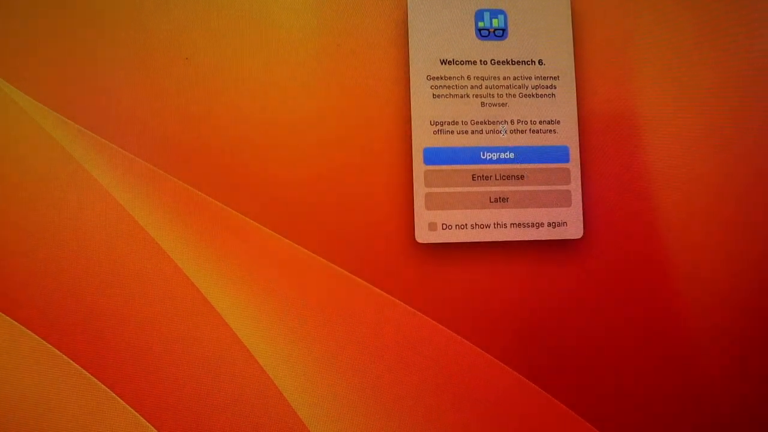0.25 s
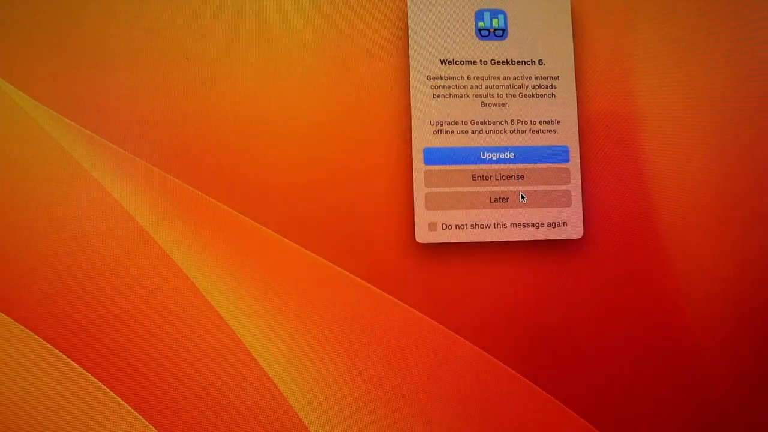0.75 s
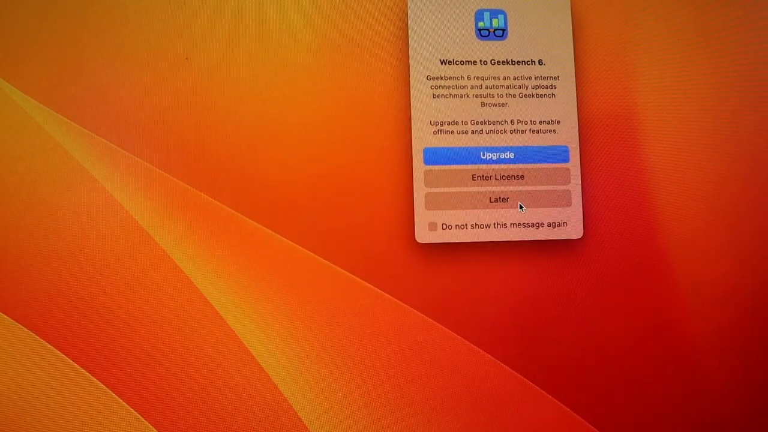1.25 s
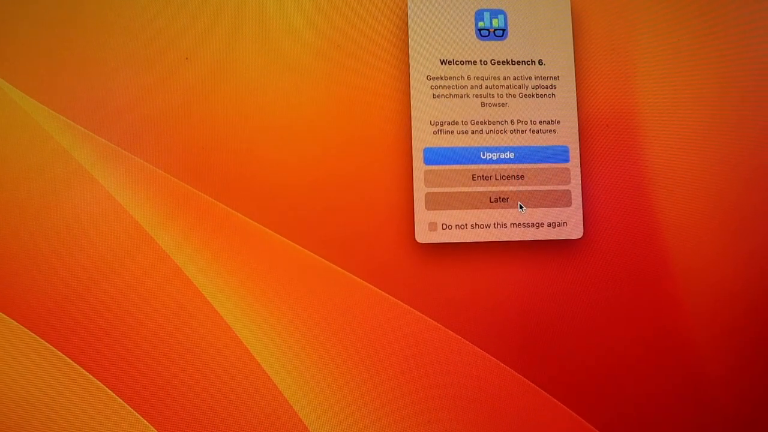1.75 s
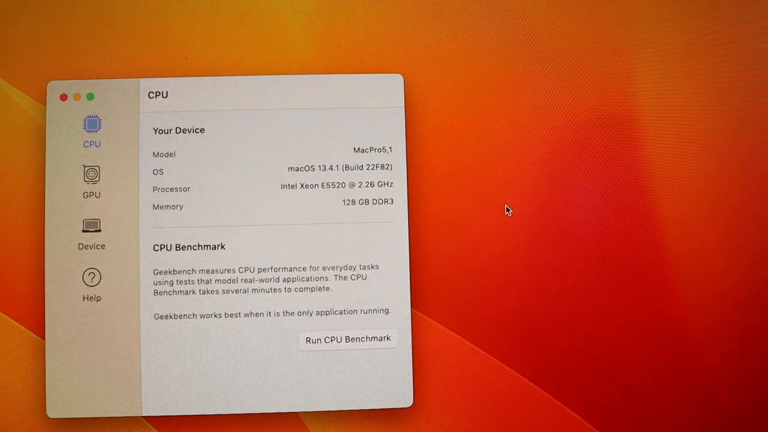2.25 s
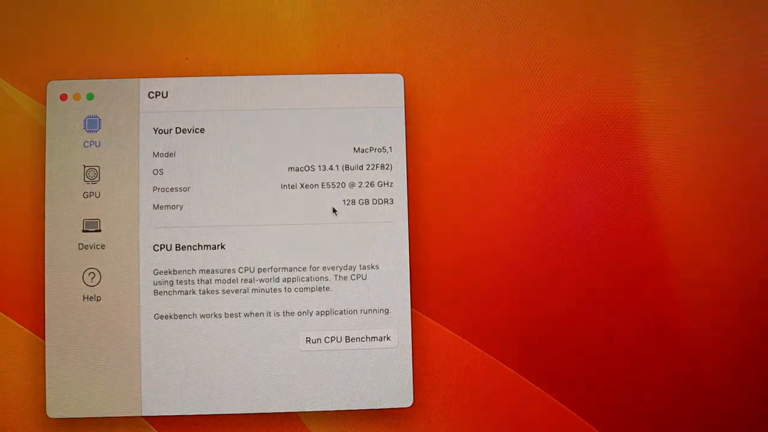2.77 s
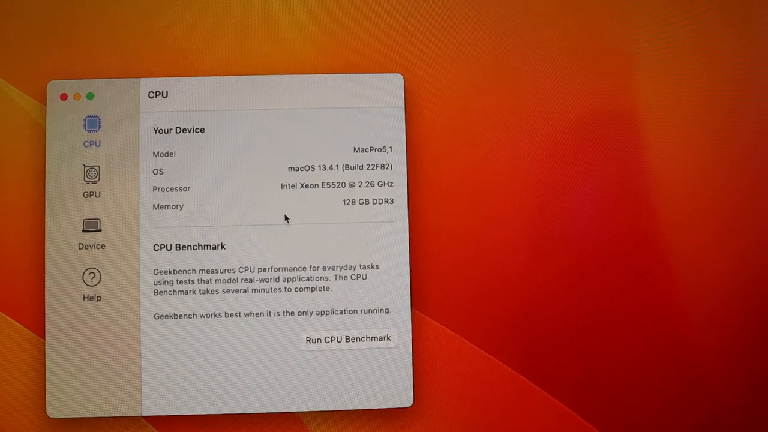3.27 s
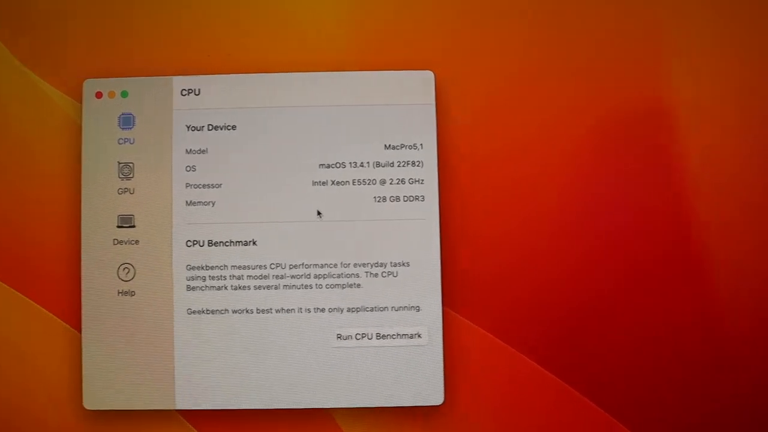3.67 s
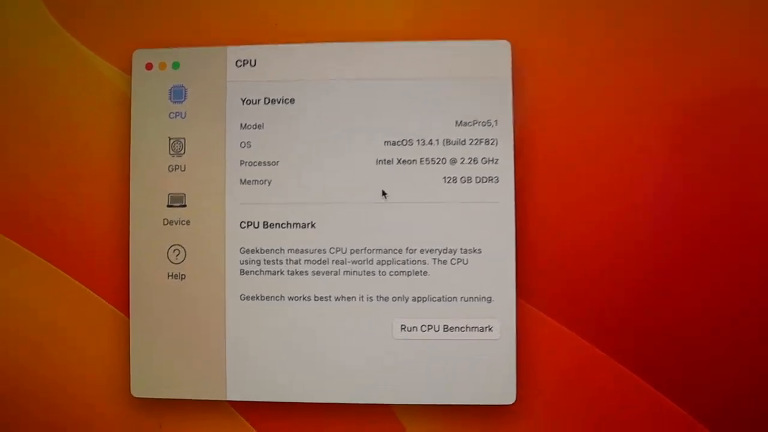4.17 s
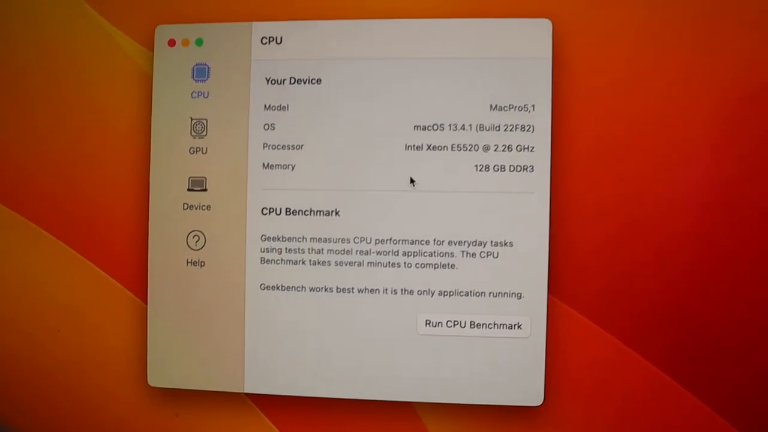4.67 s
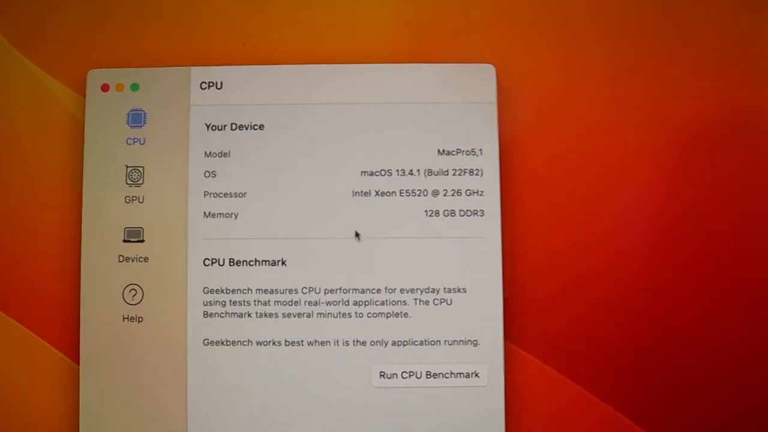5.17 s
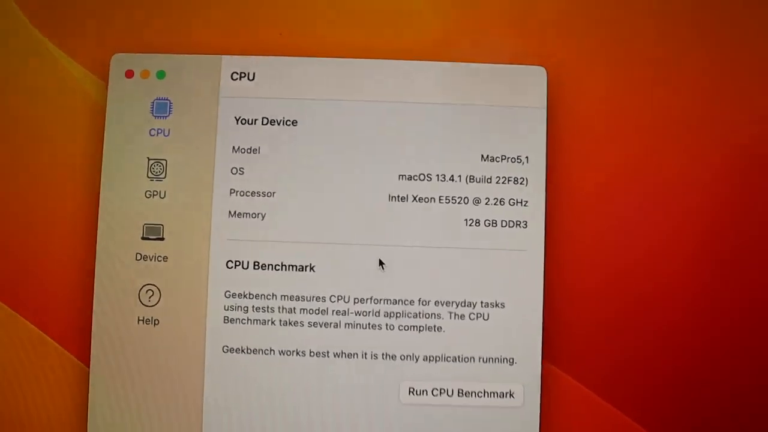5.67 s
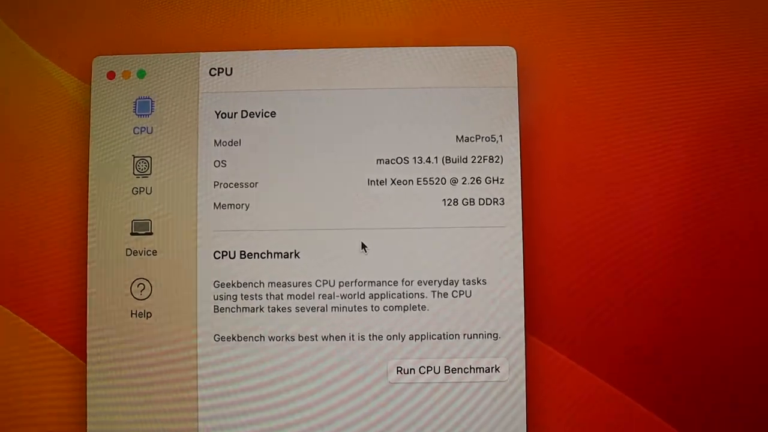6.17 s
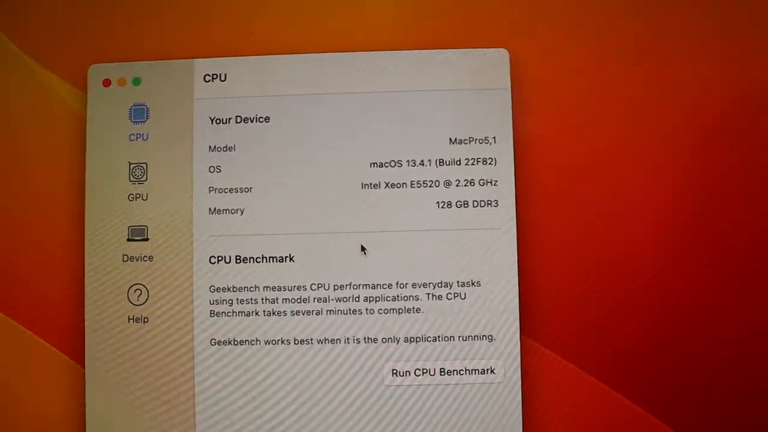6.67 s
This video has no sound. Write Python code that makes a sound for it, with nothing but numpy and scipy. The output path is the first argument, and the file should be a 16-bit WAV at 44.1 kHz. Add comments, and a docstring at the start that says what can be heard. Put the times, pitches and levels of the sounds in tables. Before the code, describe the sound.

Rushing air and a faint hum from computer fans fill a small room throughout. After a light mouse click, a hand starts to rumble softly on the microphone. The mouse taps the desk and scrapes faintly, then lands with one loud, sharp plastic clack and slides with a short rasp. The recorder's case creaks once and takes several dull bumps while the fans keep running.

```python
"""A desktop computer's cooling fans whir throughout in a small room: rushing air, faint blade tones.
At 1.3 s a mouse button clicks, its switch ringing the plastic shell. From 3.2 s the hand on the
camera adds low rumble. Near 3.6 s something hard, likely the mouse, knocks on the desk, rattles and
slides; at 5.3 s it knocks much harder, then slides again. From 5.5 s the camera's case creaks once
and takes a few soft bumps. Both channels carry the same sound."""
import sys
import numpy as np
from scipy import signal
from scipy.fft import rfft, irfft, next_fast_len
from scipy.io import wavfile
from scipy.ndimage import map_coordinates

SR = 44100
rng = np.random.default_rng(int(sys.argv[2]) if len(sys.argv) > 2 else 0)


def store_wav(level_fs):
    """Save 16-bit WAV to argv[1]."""
    pcm = np.round(np.clip(np.atleast_2d(level_fs), -1, 1) * 32767)
    wavfile.write(sys.argv[1], SR, pcm.T.astype(np.int16))


N = 305216

# air through the case: freq_hz, density_db
AIR_SPECTRUM = [(25, -12), (55, -11.5), (125, 4.5), (185, -3.5), (240, 2.5), (410, -1), (700, 3),
                (1750, -1), (2400, -2.5), (3200, -7.5), (6800, -12.5), (9800, -22.5), (12500, -27),
                (15800, -29)]
# duct and grille resonances: centre_hz, width_hz, boost_db
DUCT_MODES = [(221.5, 12, 6.5), (339.2, 7.9, 10), (1146, 76, 7), (1364, 44, 7.5), (1556, 84, 7),
              (1795, 152, 5.5), (3990, 200, 2.5), (5240, 320, 2)]
# blade tones and motor hum: pitch_hz, rms_db, flutter_db
FAN_TONES = [(75.2, -63, 2), (119.8, -61, 2), (684.8, -45.5, 1.0), (784.5, -52.5, 1), (880, -61, 5),
             (1139, -57.5, 4.5), (1341, -51.5, 4.5), (1558, -58.5, 2.5), (1780, -67, -2), (2159, -58, 3.5),
             (2339, -58.5, 2.5)]

def fans():
    """Turbulent air coloured by the ducts, plus blade tones that drift and flutter in it."""
    def air_db(hz):
        boosts = (db / (1 + (2 * (hz - centre) / width) ** 2) for centre, width, db in DUCT_MODES)
        return along(AIR_SPECTRUM, hz) + sum(boosts)

    rush_db = -38.5 + 0.1376 * np.arange(N) / SR  # grows slightly as the camera moves
    out = amp(rush_db + 0.16 * wobble(5.01)) * noise(air_db)
    for pitch_hz, rms_db, flutter_db in FAN_TONES:
        speed = 1 + .001 * wobble(1.2) + .0024 * wobble(35)
        flutter = amp(flutter_db * wobble(11))
        phase = 2 * np.pi * np.cumsum(pitch_hz * speed) / SR
        out += amp(rms_db) * unit(flutter * np.sin(phase))
    return out


# hard contacts on the desk: start_s, knock_db, rattle_db, t60_s
CONTACTS = [(3.614, -44, -46, .02), (3.629, -26, -54, 0.07), (3.789, -31.5, -52, 0.041),
            (5.224, -32, -52, .04), (5.2579, -6, -14, 0.016), (5.2595, -10.5, -18, 0.014),
            (5.265, -19.5, -29, 0.047), (5.291, -37, -29, 0.046), (5.2930, -22.5, -17, 0.043),
            (6.658, -31, -38, 0.031)]
# crack of a contact: freq_hz, density_db
CRACK_SPECTRUM = [(35, -12), (70, -11), (190, -16), (270, 9), (480, 2.5), (950, 5.5), (1500, 5), (2100, 5),
                  (2400, 2), (3100, -5), (4200, -7.5), (5600, -8.5), (6800, -23), (9400, -27), (11000, -41),
                  (15800, -30)]
# loose plastic parts: freq_hz, density_db
RATTLE_SPECTRUM = [(1000, -23), (2500, -14), (3400, -3.5), (5700, -1), (7250, 0.5), (9200, 2), (10800, -9),
                   (14000, -3.5), (15800, -11)]
# desk top modes: pitch_hz, gain_db, t60_s
DESK_MODES = [(129, -23.5, 0.27), (246, -14, 0.13), (284, -19.5, 0.11), (1025, -3, 0.015)]

def knocks():
    """Each contact cracks, shakes loose plastic parts and sets the desk ringing."""
    blows, shakes, ring = np.zeros((3, N))
    t = np.arange(SR // 2) / SR
    desk = sum(amp(db) * np.sin(2 * np.pi * hz * t) * decay(t, t60_s) for hz, db, t60_s in DESK_MODES)
    for start_s, knock_db, rattle_db, t60_s in CONTACTS:
        add(blows, start_s, amp(knock_db) * burst(t60_s))
        add(shakes, start_s, amp(rattle_db) * burst(t60_s))
        add(ring, start_s, amp(knock_db) * desk)
    crack = filtered(blows, lambda hz: minimum_phase(CRACK_SPECTRUM, hz))
    rattle = filtered(shakes, lambda hz: minimum_phase(RATTLE_SPECTRUM, hz))
    return crack + rattle + ring


# friction on the desk: freq_hz, density_db
FRICTION_SPECTRUM = [(150, -5), (600, -8), (2300, 5), (2800, -3.5), (3600, 3.5), (4500, 0), (7000, -4.5),
                     (8500, -8), (10000, -10.5), (11000, -14.5), (13000, -15), (14500, -20), (15800, -21)]
# pushes of the mouse: start_s, length_s, level_db
PUSHES = [(3.385, 0.053, -48), (3.585, 0.27, -46.5), (4.25, .2, -48.5), (5.832, 0.076, -37),
          (5.968, 0.34, -35.5), (6.68, .08, -50)]

def slide():
    """The mouse's feet catch on the desk's grain; its many small resonances colour the rasp."""
    grain = amp(wobble(400))
    rasp = unit(grain * noise(lambda hz: along(FRICTION_SPECTRUM, hz)))
    resonance = unit(signal.fftconvolve(rasp, burst(t60_s=0.074))[:N])
    envelope = gestures(PUSHES, attack_s=.022, hold_s=.13, ease_db_per_s=38, release_db_per_s=190)
    return envelope * unit(rasp + .5 * resonance)


# switch snaps: start_s, level_db, highpass_hz
SWITCH_SNAPS = [(1.3102, -37.5, 3500), (1.3112, -34, 3500), (1.4603, -32, 4000), (1.4620, -38, 2000),
                (5.548, -42, 12000)]
# plastic mouse shell: centre_hz, width_hz, gain_db
SHELL_MODES = [(3800, 660, -1.5), (6200, 780, 4), (6800, 544, 2), (8500, 690, 8.5), (12000, 372, 2.5),
               (13000, 1250, 3.5)]

def button():
    """The switch snaps over and rings the shell; light touches reach only its high modes."""
    def shell(hz):
        return unit(sum((-1) ** k * amp(db) * resonator(hz, centre_hz, width_hz)
                        for k, (centre_hz, width_hz, db) in enumerate(SHELL_MODES)))

    snaps = np.zeros(N)
    for start_s, level_db, highpass_hz in SWITCH_SNAPS:
        highpass = signal.butter(2, highpass_hz, "high", fs=SR, output="sos")
        add(snaps, start_s, amp(level_db) * signal.sosfilt(highpass, burst(t60_s=.005)))
    return filtered(snaps, shell) + amp(-8) * snaps


# hand rumble: freq_hz, density_db
RUMBLE_SPECTRUM = [(20, -5), (45, 5), (85, -5), (135, 5.5), (190, -18), (280, -10), (480, -11), (900, -50),
                   (2500, -56)]
# finger shifts: start_s, length_s, level_db
FINGER_SHIFTS = [(3.22, 0.21, -47), (3.6, .4, -55), (4.11, 0.77, -45.5), (4.94, 0.24, -45),
                 (5.33, 0.078, -40.5), (5.55, 0.17, -38), (5.87, 0.38, -44), (6.67, 0.27, -38.5)]
# creak of the camera's case: start_s, length_s, level_db
CASE_CREAKS = [(5.54, 0.12, -43)]
# soft bumps on the camera body: centre_s, peak_db, pitch_hz
BODY_BUMPS = [(5.579, -27, 136), (5.656, -30, 149), (5.678, -25.5, 470), (6.12, -30, 122), (6.733, -23, 96),
              (6.763, -29, 350), (6.766, -21.5, 132), (6.786, -21, 85.5), (6.88, -31, 40)]

def handling():
    """Fingers shift on the camera: uneven rumble, a short creak of the case, dull bumps."""
    resting_db = -69
    shape = dict(attack_s=.05, hold_s=.2, ease_db_per_s=3, release_db_per_s=90)
    grip = amp(resting_db) + gestures(FINGER_SHIFTS, **shape)
    rumble = unit(amp(2.7 * wobble(11)) * noise(lambda hz: along(RUMBLE_SPECTRUM, hz)))
    creak = filtered(rng.standard_normal(N), lambda hz: resonator(hz, centre_hz=474, width_hz=53) ** 2)
    out = grip * rumble + gestures(CASE_CREAKS, **shape) * unit(creak)
    for centre_s, peak_db, pitch_hz in BODY_BUMPS:
        cycles = (np.arange(N) / SR - centre_s) * pitch_hz
        out += amp(peak_db) * np.cos(2 * np.pi * cycles) * np.exp(-(cycles / 0.72) ** 2)
    return out


# reverberation time: freq_hz, t60_s
ROOM_DECAY = [(150, 0.82), (1000, 0.35), (4000, 0.47), (9000, 0.39), (15000, 0.17)]

def room(x, wet_db, delay_s):
    """The walls add a short tail; each frequency dies at its own rate."""
    hz, t, bands = signal.stft(rng.standard_normal(SR // 2), SR, nperseg=256)
    bands *= decay(t, along(ROOM_DECAY, hz)[:, None])
    _, tail = signal.istft(bands, SR, nperseg=256)
    tail = np.pad(tail / np.linalg.norm(tail), (round(delay_s * SR), 0))
    return x + amp(wet_db) * signal.fftconvolve(x, tail)[:N]


def gestures(moves, attack_s, hold_s, ease_db_per_s, release_db_per_s):
    """Envelope of hand moves: each rises, holds, eases off and dies once the hand stops."""
    gain = np.zeros(N)
    for start_s, length_s, level_db in moves:
        t = np.arange(N) / SR - start_s
        ease_db = ease_db_per_s * np.maximum(t - hold_s, 0)
        release_db = release_db_per_s * np.maximum(t - length_s, 0)
        gain += np.clip(t / attack_s, 0, 1) * amp(level_db - ease_db - release_db)
    return gain


def amp(db):
    return 10 ** (np.asarray(db) / 20)


def unit(x):
    """Scale to rms 1."""
    return x / np.sqrt(np.mean(x ** 2) + 1e-20)


def decay(t, t60_s):
    return np.exp(-np.log(1000) * t / t60_s)


def along(points, hz):
    """Interpolate (freq_hz, value) points on a log frequency axis."""
    freq_hz, values = np.transpose(points)
    return np.interp(np.log(hz + 1), np.log(freq_hz + 1), values)


def wobble(knots_per_s):
    """Smooth random curve."""
    knots = rng.standard_normal(int(N * knots_per_s / SR) + 4)
    return map_coordinates(knots, [np.arange(N) * knots_per_s / SR])


def filtered(x, response):
    """Apply the complex gain response(hz)."""
    size = 2 * next_fast_len((N + SR) // 2, real=True)
    return irfft(rfft(x, size) * response(np.fft.rfftfreq(size, 1 / SR)), size)[:N]


def noise(db_at):
    """Noise of rms 1 with spectrum db_at(hz)."""
    return unit(filtered(rng.standard_normal(N), lambda hz: amp(db_at(hz))))


def resonator(hz, centre_hz, width_hz):
    """Band-pass response of one mode."""
    return 1j * hz * width_hz / (centre_hz ** 2 - hz ** 2 + 1j * hz * width_hz)


def minimum_phase(spectrum, hz):
    """Causal response of unit power with the given spectrum."""
    magnitude = unit(amp(along(spectrum, hz)))
    cepstrum = irfft(np.log(np.maximum(magnitude, 1e-6)))
    half = len(cepstrum) // 2
    return np.exp(rfft(np.r_[cepstrum[0], 2 * cepstrum[1:half], np.zeros(half)]))


def burst(t60_s):
    """Dying spray of tiny contacts."""
    t = np.arange(SR // 4) / SR
    return rng.choice([-1, 1], len(t)) * decay(t, t60_s)


def add(track, start_s, sound):
    part = track[round(start_s * SR):][:len(sound)]
    part += sound[:len(part)]


def scene():
    """Mono mix on two channels; only knocks and clicks reverberate."""
    mouse = room(knocks(), wet_db=-8.0, delay_s=.004)
    mouse += room(button(), wet_db=-8.5, delay_s=.0015)
    mouse += slide()
    return np.tile(fans() + mouse + handling(), (2, 1))


def record(dry):
    """The camera rounds off peaks at full scale and cuts everything above its band limit."""
    band_limit_hz = 15850
    limited = dry / (1 + dry ** 8) ** (1 / 8)
    return np.array([filtered(channel, lambda hz: hz < band_limit_hz) for channel in limited])


dry = scene()
out = record(dry)
store_wav(out)
```